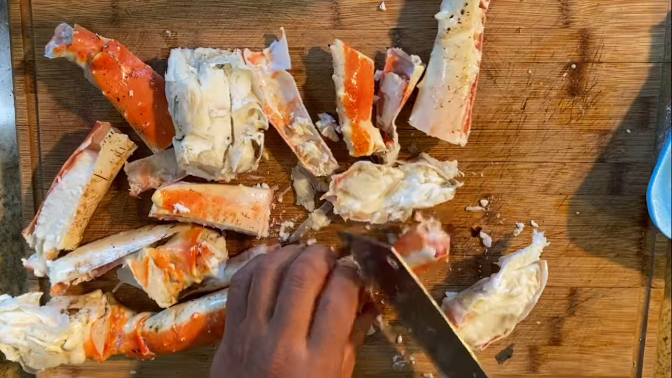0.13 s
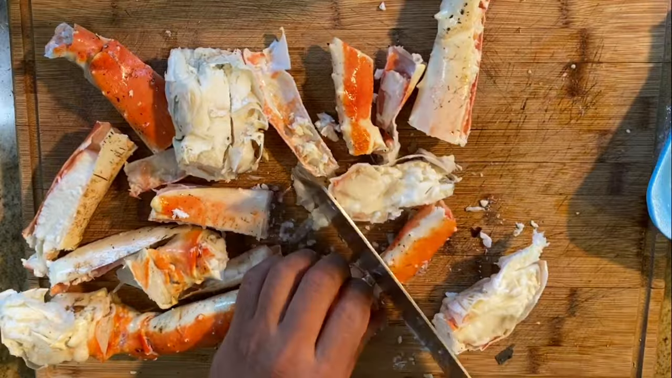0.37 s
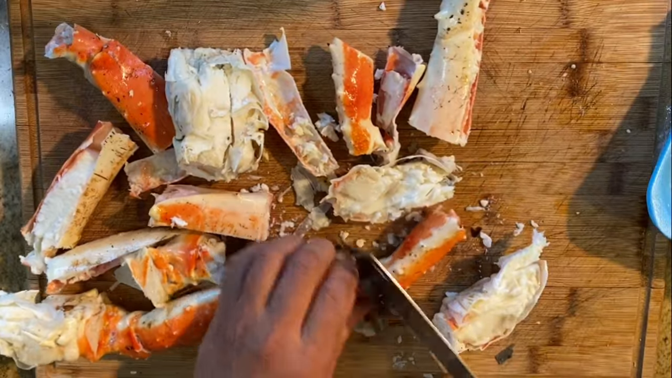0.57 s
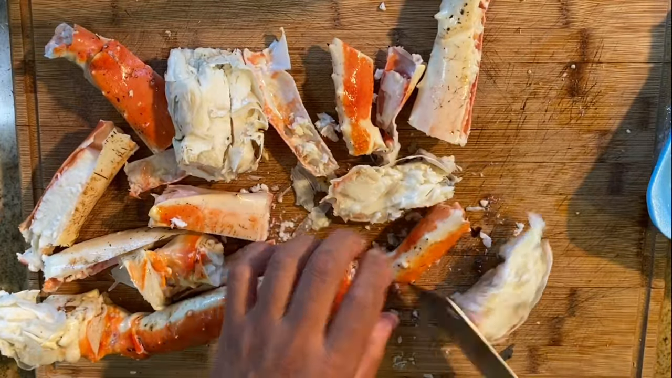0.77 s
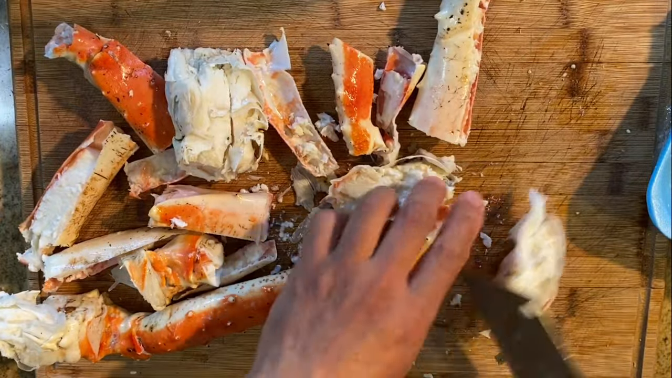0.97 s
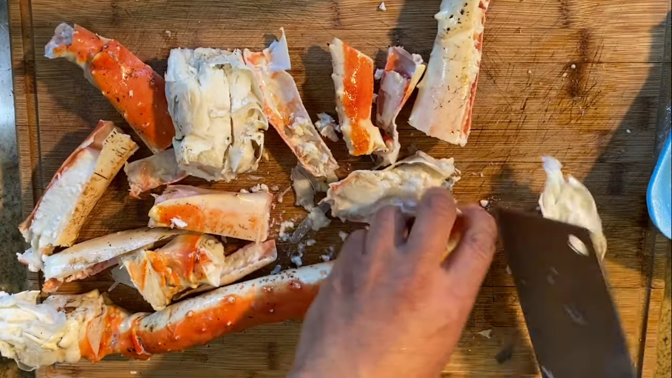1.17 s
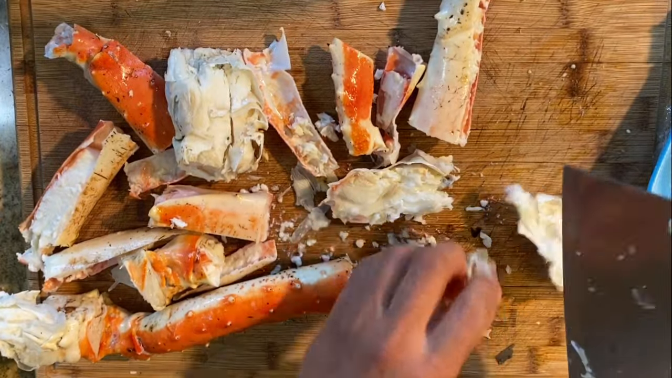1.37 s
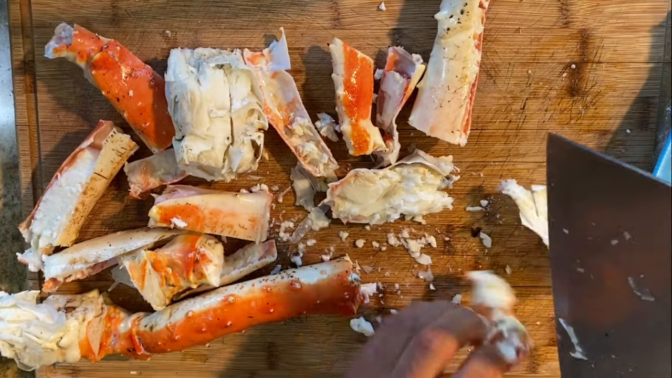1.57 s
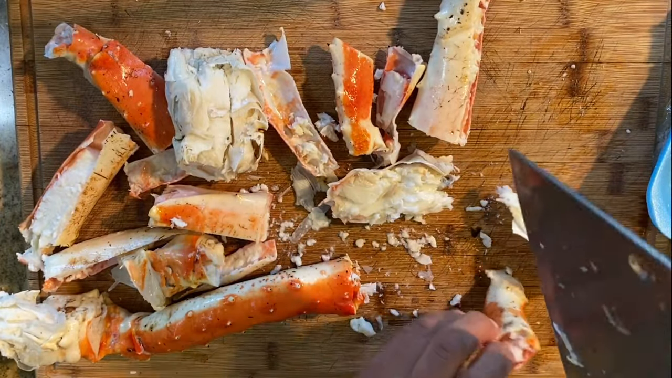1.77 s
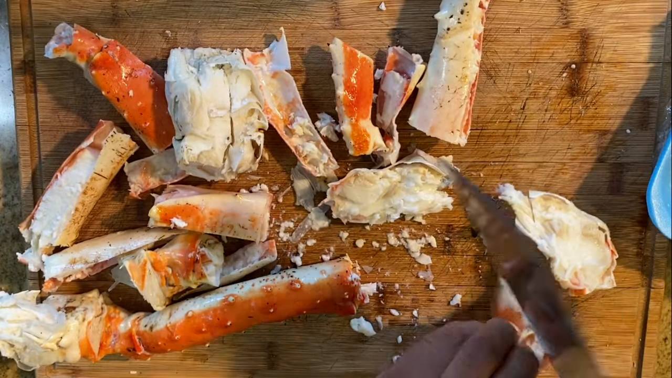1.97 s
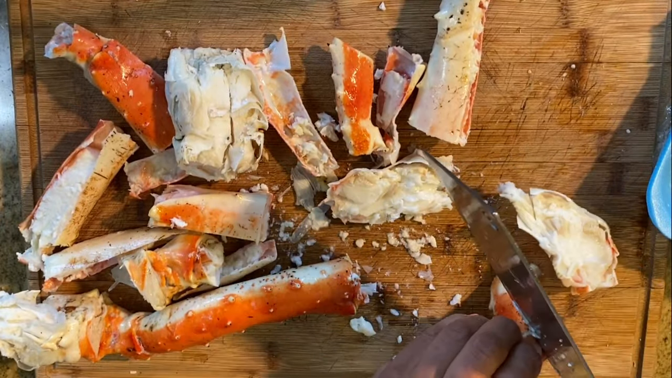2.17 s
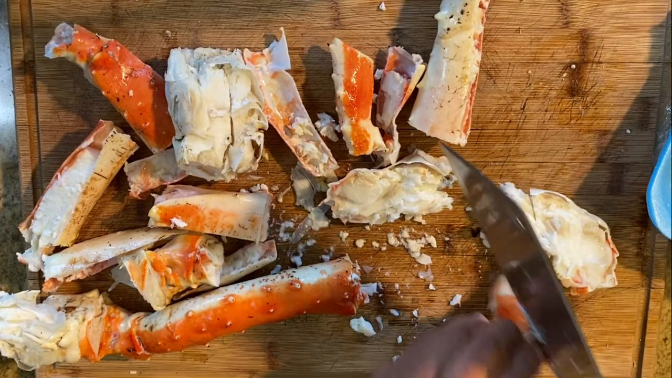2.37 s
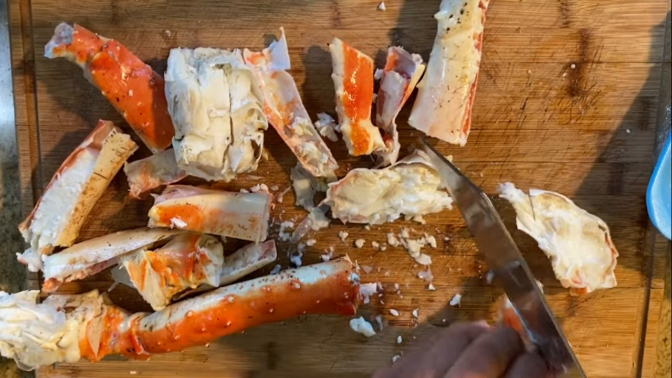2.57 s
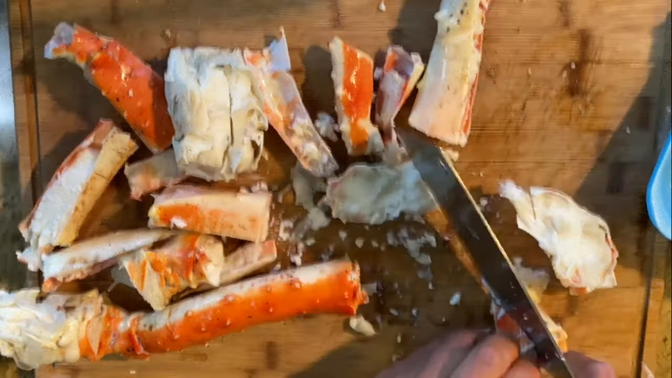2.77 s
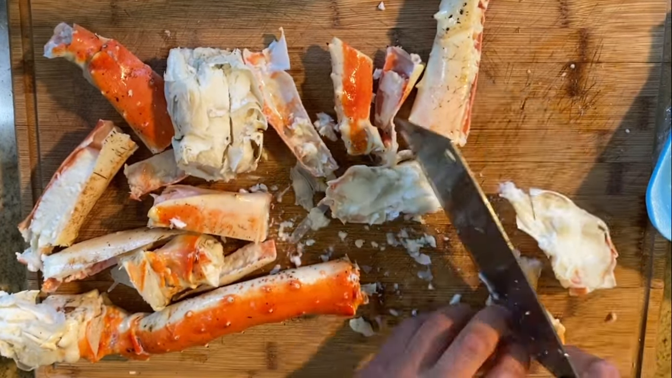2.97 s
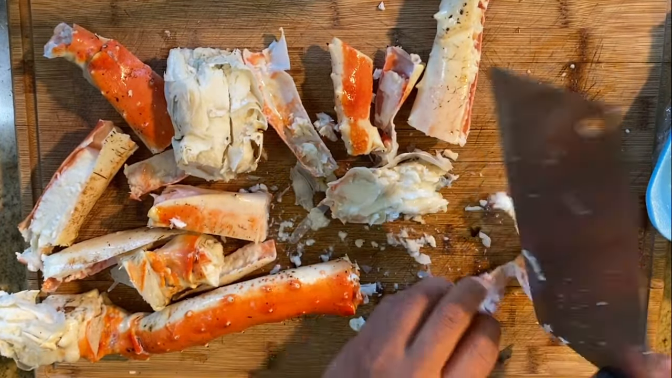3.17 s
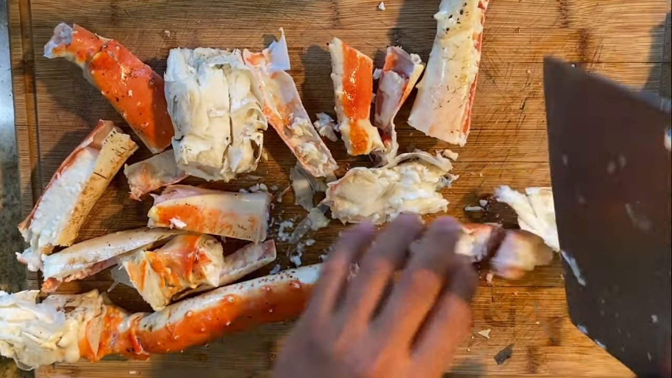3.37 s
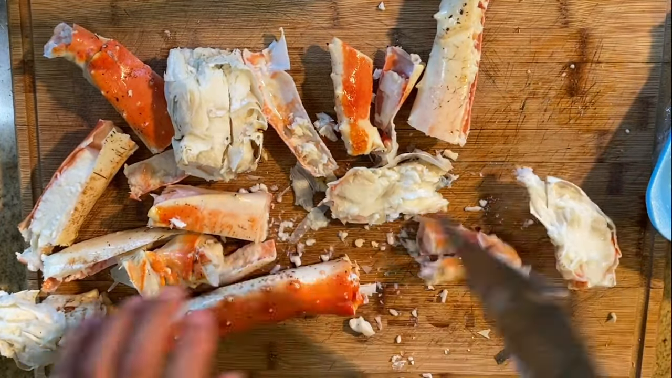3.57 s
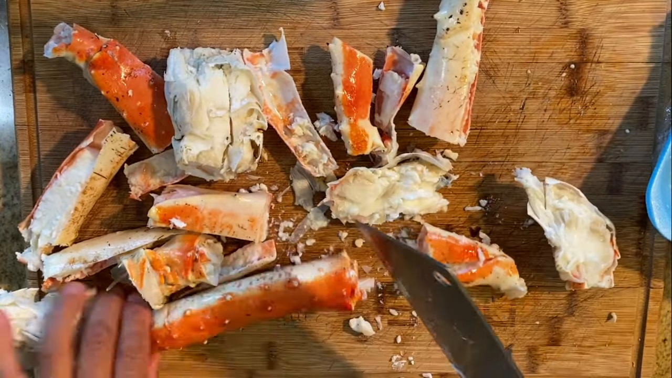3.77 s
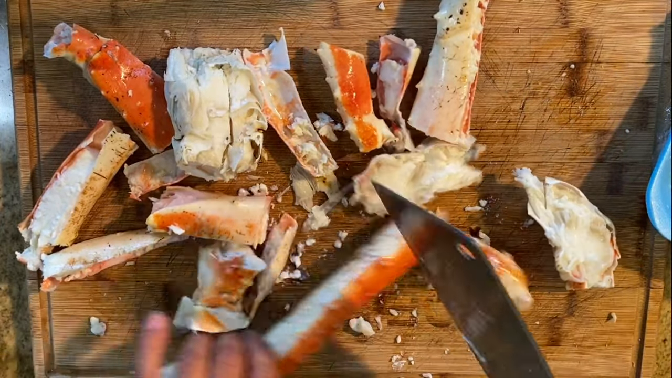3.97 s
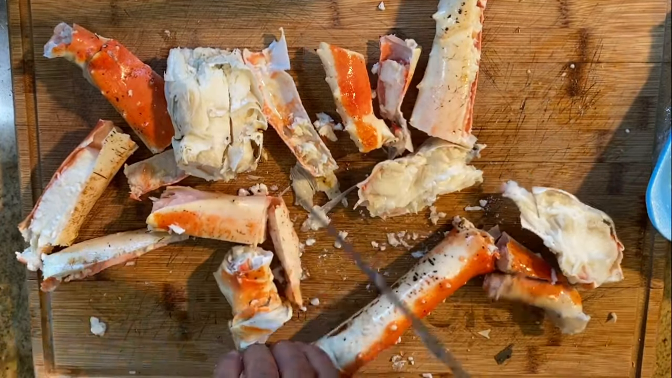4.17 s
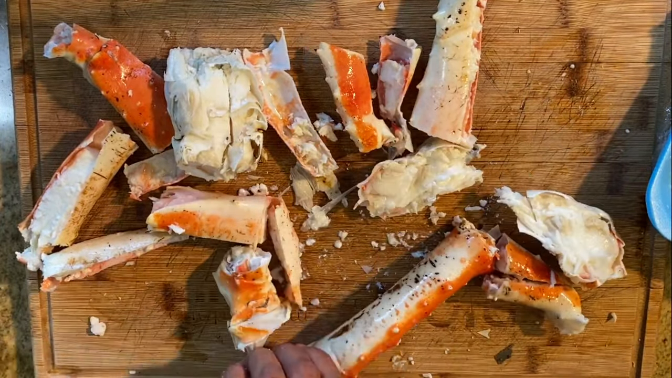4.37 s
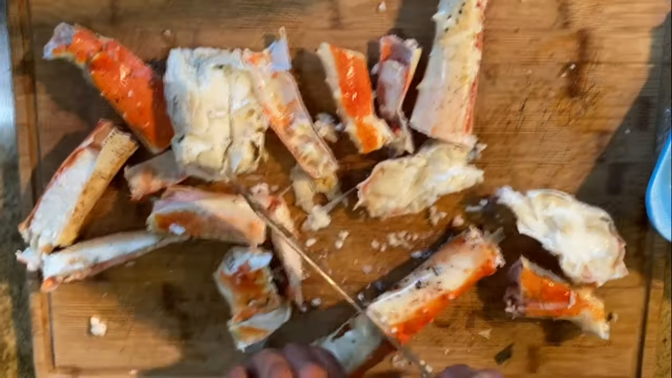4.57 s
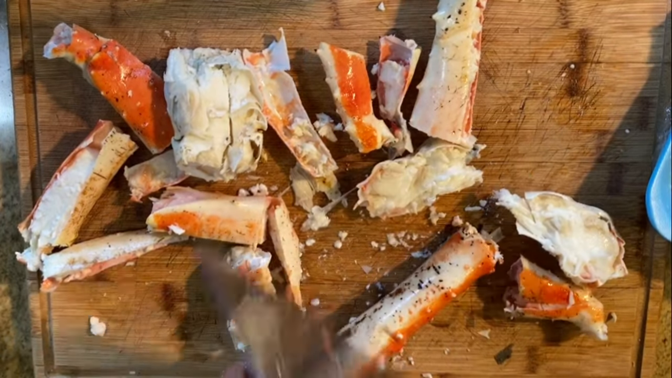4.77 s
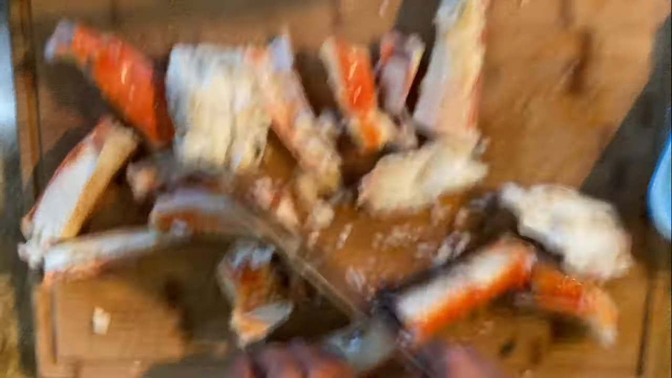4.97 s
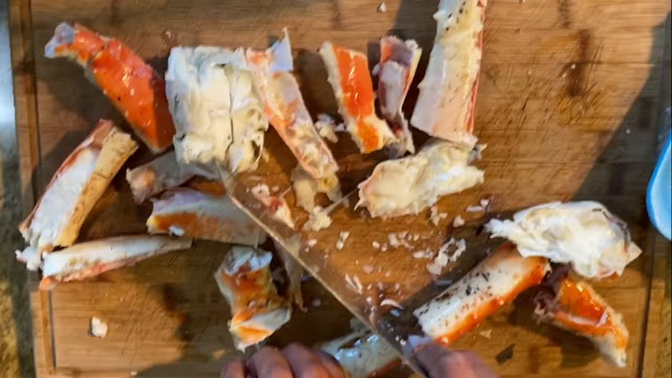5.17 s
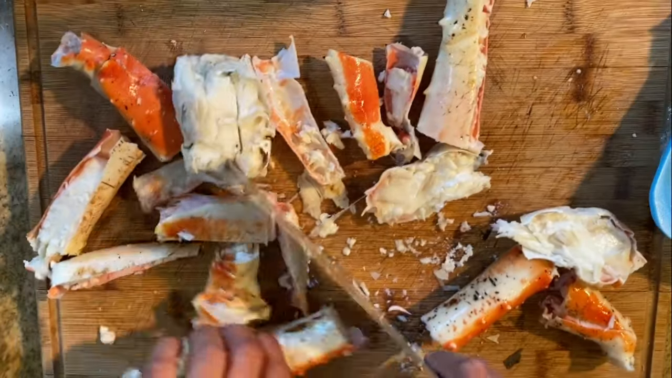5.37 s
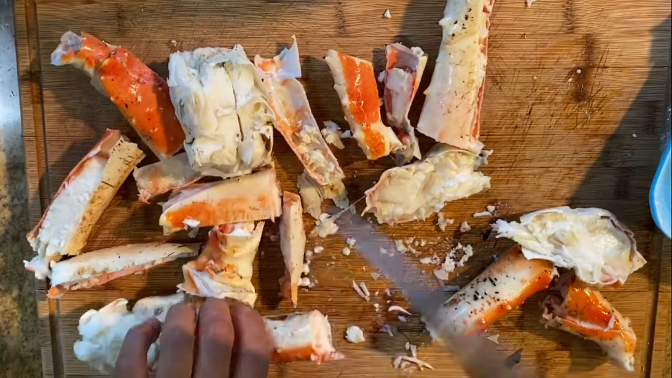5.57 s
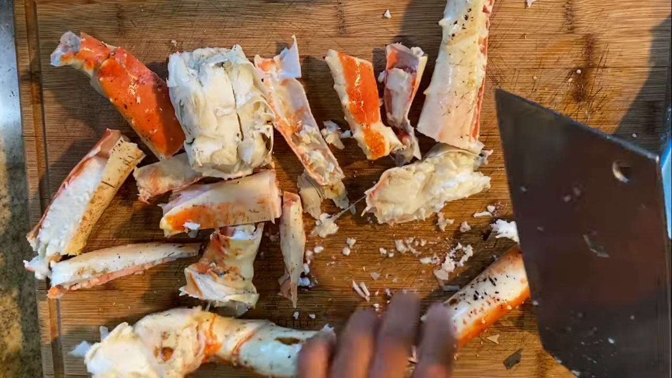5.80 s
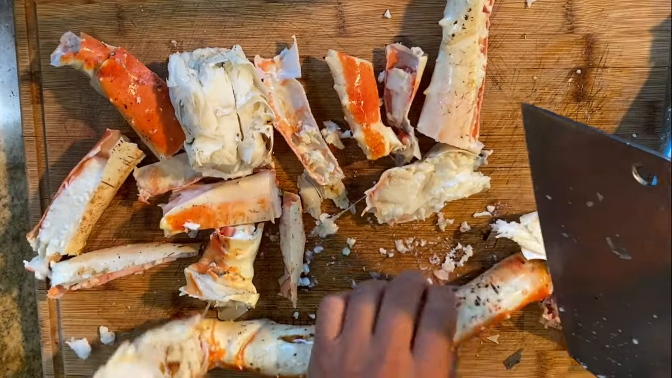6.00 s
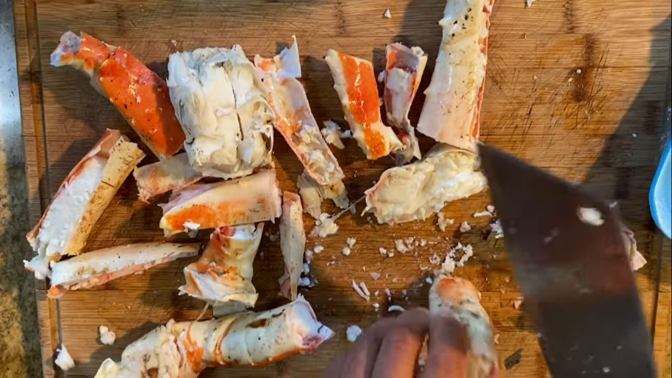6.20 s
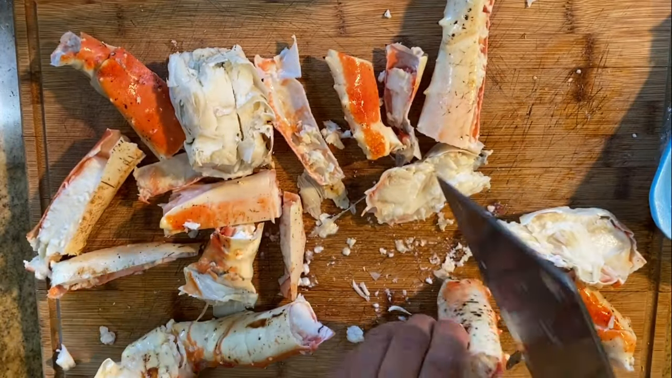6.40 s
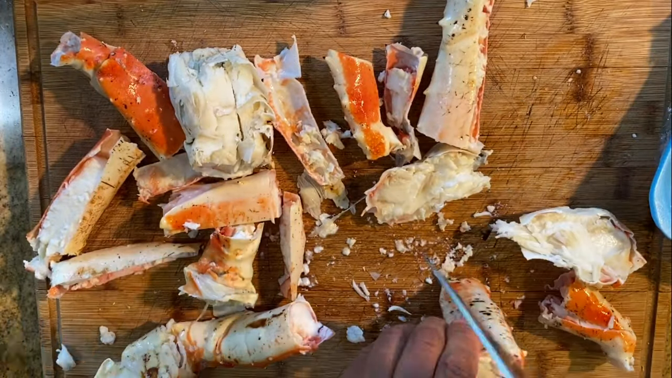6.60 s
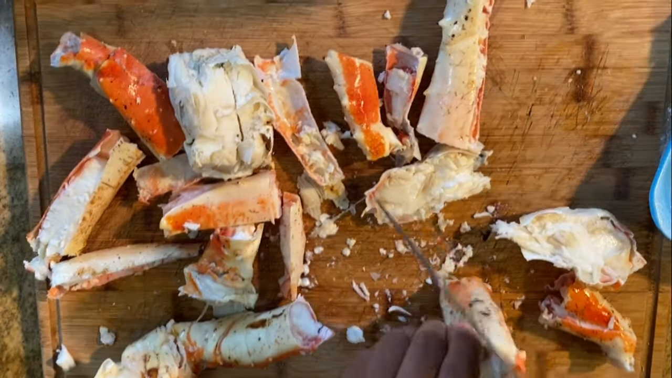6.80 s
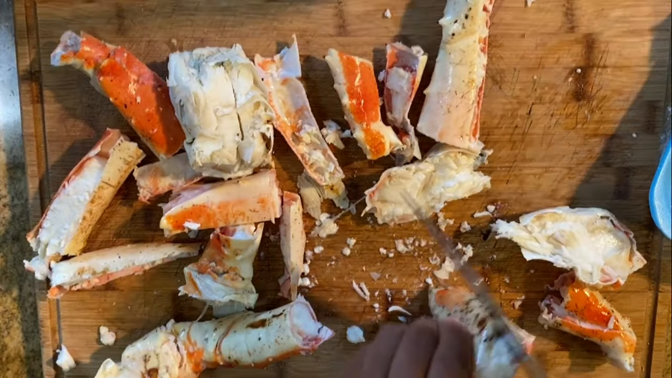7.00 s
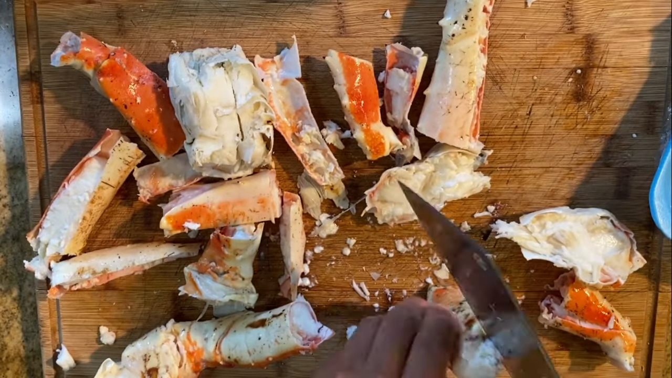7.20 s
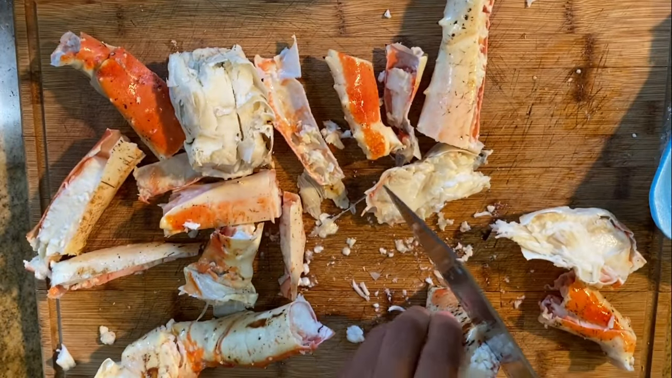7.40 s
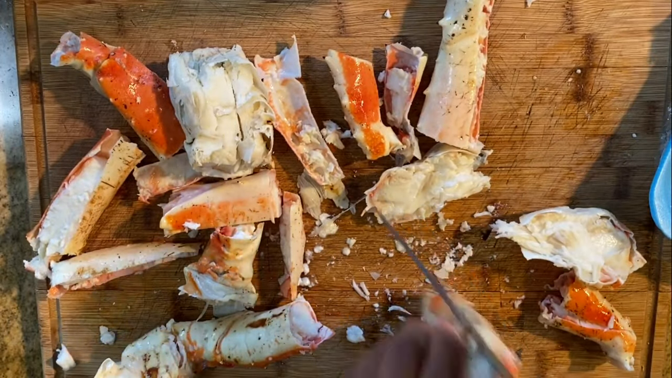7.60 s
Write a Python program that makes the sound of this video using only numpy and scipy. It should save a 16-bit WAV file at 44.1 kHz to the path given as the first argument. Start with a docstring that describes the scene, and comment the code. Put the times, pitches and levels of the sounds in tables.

```python
"""A small kitchen, the microphone close to a wooden board where a heavy knife chops crab legs.
Machines hum throughout. A few chops open: each splinters the shell in a volley of cracks and knocks
the board, and the room rings briefly. Three hard chops fall from 2 to 2.7 s, then pieces are slid and
tapped about. Two more land near 4.4 and 4.9 s; after more sliding, lighter chops close from 6.6 s.
A soft limiter holds the loudest blows."""
import sys
import numpy as np
from scipy import signal
from scipy.fft import rfft, irfft
from scipy.io import wavfile
from scipy.ndimage import uniform_filter1d

SR = 44100
rng = np.random.default_rng(int(sys.argv[2]) if len(sys.argv) > 2 else 0)


def generate_wav(sig):
    """Save sig (samples, or channels by samples) to the path in sys.argv[1] as 16-bit PCM at SR."""
    pcm = np.round(np.clip(np.atleast_2d(sig).T, -1, 1) * 32767).astype(np.int16)
    wavfile.write(sys.argv[1], SR, pcm)


N = 337213

# modes of the wooden board: (frequency [Hz], relative level [dB], free t60 [s])
BOARD_MODES = [(235, 1, 0.24), (287, -0.5, 0.05), (395, 0, 0.2), (510, 0.5, 0.037), (582, -3.5, 0.012),
               (722, 2, 0.028), (744, -3.5, 0.049), (823, 1, 0.063), (913, -3.5, 0.048),
               (1000, -1.5, 0.055), (1160, -3.5, 0.026), (1170, -1, 0.057), (1320, -6.5, 0.039),
               (1460, -3.5, 0.053), (1580, -4.5, 0.013), (1760, -4.5, 0.036), (1955, -3.5, 0.031),
               (2240, -6, 0.053), (2430, -5, .03), (2750, -4.5, .03), (3080, -8, 0.016),
               (3700, -13.5, 0.039)]


def gain_of(db):
    """Decibels to a factor."""
    return 10 ** (np.asarray(db) / 20)


def unit_rms(x):
    """Scales to rms 1."""
    return x / np.sqrt(np.mean(x ** 2) + 1e-20)


def curve_at(points, hz):
    """Interpolates a (frequency [Hz], value) table on a log axis."""
    f, value = np.transpose(points)
    return np.interp(np.log(hz + 1), np.log(f + 1), value)


def add(mix, s, sound):
    """Mixes a sound in at second s."""
    part = mix[round(s * SR):][:len(sound)]
    part += sound[:len(part)]


def coloured(x, spectrum):
    """Filters x by a (frequency [Hz], gain [dB]) table."""
    return irfft(rfft(x) * gain_of(curve_at(spectrum, np.fft.rfftfreq(len(x), 1 / SR))), len(x))


def patchy(noise, bins, frames):
    """Smooths a frequency-by-time grid of noise into patches of rms 1."""
    return unit_rms(uniform_filter1d(uniform_filter1d(noise, bins, axis=0), frames, axis=1))


def ring(modes, t, weight_db, phase_turns=0):
    """Dying sines, one for each mode."""
    hz, db, t60 = np.transpose(modes)[:, :, None]
    envelopes = gain_of(db + weight_db[:, None] - 60 * t / t60)
    return (envelopes * np.sin(2 * np.pi * (hz * t + phase_turns))).sum(0)


def wavering(hz, width_hz):
    """A tone whose strength and phase drift; narrow ones hold a steady core."""
    noise = rng.standard_normal(N) + 1j * rng.standard_normal(N)
    drift = signal.lfilter([1], [1, -np.exp(-np.pi * width_hz / SR)], noise)
    envelope = drift / abs(drift).std() + 8 / width_hz
    return unit_rms((envelope * np.exp(2j * np.pi * hz * np.arange(N) / SR)).real)


def room_tone():
    """The kitchen's low noise, drifting in patches."""
    # noise spectrum: (frequency [Hz], relative density [dB])
    spectrum = [(15, -71.5), (25, -42.5), (65, -14.5), (155, -14.5), (196, -20.5), (230, -5.5), (360, -27),
                (457, -14.5), (775, -23.5), (1390, -26.5), (1810, -39), (3990, -36.5), (13800, -44)]
    frames, hz = N // 256 + 5, np.fft.rfftfreq(1024, 1 / SR)
    real, imag, drift = rng.standard_normal((frames, 513, 3)).T
    bands = (real + 1j * imag) * gain_of(curve_at(spectrum, hz)[:, None] + 2.6 * patchy(drift, 20, 14))
    return gain_of(-58) * unit_rms(signal.istft(bands, nperseg=1024, noverlap=768)[1][:N])


def machine_hum():
    """The wavering tones of running machines."""
    # tones: (frequency [Hz], rms level [dB], width [Hz])
    tones = [(73, -64.5, 13), (153, -64, 9.7), (233, -62, 19), (4130, -78, 12), (15504, -73, 2)]
    return sum(gain_of(db) * wavering(hz, width_hz) for hz, db, width_hz in tones)


def machine_whir(rest_db=-77.5):
    """A fuzzy tone swells and fades over a faint rest level."""
    # swells: (peak time [s], peak level [dB], 20 dB rise [s], 20 dB fall [s])
    swells = [(0.15, -52, 0.08, .3), (0.5, -48, 0.09, 0.45), (0.82, -60, 0.36, 0.6),
              (2.84, -53, 0.17, 0.18), (3.7, -65.5, .2, 0.45), (4.6, -65.5, .1, 0.17),
              (5.11, -53, .08, 0.46), (6.19, -66, .15, .25), (7.3, -65.5, .15, .5)]
    t = np.arange(N) / SR
    swells_db = [db - 20 * np.where(t < s, (s - t) / rise, (t - s) / fall)
                 for s, db, rise, fall in swells]
    return gain_of(np.maximum(np.max(swells_db, 0), rest_db)) * wavering(1603, width_hz=70)


def kitchen_echoes(sent, next_room_db=-7.5, next_room_stretch=2.01):
    """Sparse echoes, each band dying at its own speed; the next room rings weaker and longer."""
    # decay of the kitchen: (frequency [Hz], t60 [s])
    decay = [(100, 0.17), (300, 0.2), (700, 0.25), (1800, 0.3), (5000, 0.28), (9000, .23), (14000, 0.098)]
    # colour of the echoes: (frequency [Hz], energy [dB])
    colour = [(100, -2.5), (500, -11), (2000, -7.5), (6000, -10.5), (14000, -11)]
    slots = np.arange(200, SR - 20, 20)
    turn = np.arange(N) / SR * 400
    echoes = np.zeros(N)
    for k in range(3):  # three tails take turns
        taps = np.zeros(SR)
        taps[slots + rng.integers(0, 20, len(slots))] = rng.choice([-1., 1.], len(slots))
        hz, t, bands = signal.stft(taps, SR, nperseg=256)
        fall_db = -60 * t / curve_at(decay, hz)[:, None]
        fall = np.hypot(gain_of(fall_db), gain_of(next_room_db + fall_db / next_room_stretch))
        fall /= np.linalg.norm(fall, axis=1)[:, None]  # equal energy in every band
        tail = signal.istft(bands * fall, SR, nperseg=256)[1]
        tail = coloured(tail / np.linalg.norm(tail), colour)
        share = np.sqrt(2 / 3) * np.cos(turn + 2 * np.pi * k / 3)
        echoes += signal.fftconvolve(sent * share, tail)[:N]
    return echoes


def slides_and_rustles(jerk_db=2, jerk_s=.03, ticks_per_s=500):
    """Jerky hiss and fine ticks over the board's drone, as when spiny shell catches on the grain."""
    # pieces slid over the wood, and faint rustles swelling just before the chops near 2.4, 2.7, 4.4
    # and 4.9 s: (start [s], length [s], level [dB], change to the end [dB], tilt [dB/octave],
    # drone against hiss [dB])
    strokes = [(0.0, 0.1, -53, -9, 9, -10), (0.219, .06, -43, -11, 7, -11),
               (0.438, 0.21, -46, 1.5, 7.5, 1.5), (0.68, 0.091, -49.5, -1, 0.5, -9.5),
               (0.762, 0.56, -63, 4, 4.5, -5.5), (1.389, 0.058, -60.5, 1, 2, -5),
               (1.451, 0.073, -55, -5.5, 5, -4.5), (2.35, 0.032, -63.5, 14, 6.5, -12),
               (2.631, .035, -62, 11.5, 6.5, -12), (4.395, .034, -65, 8, 6, -9),
               (4.903, .028, -63.5, 9.5, 4.5, -10), (2.879, 0.19, -45, -19.5, 6.5, -2.5),
               (3.091, 0.27, -66, 1, 10.5, -5.5), (3.36, .12, -58, -2, 1.5, -6.5),
               (3.503, 0.28, -63.5, 3, 4, -5.5), (3.763, 0.049, -57, -4, 8, -4.5),
               (3.792, 0.16, -43, -0.5, 3, -4), (3.94, .12, -46, 6.5, 5, -7),
               (4.048, 0.12, -41, -27.5, 5, -10), (5.033, .19, -39, -8.5, 2.5, -10),
               (5.36, 0.0363, -46.5, -6, 9, -3.5), (5.564, 0.1455, -56, -12, 1, -3),
               (5.744, 0.39, -61, -3, 1, -2), (6.108, .14, -53, -10, 2.5, -4.5),
               (6.282, 0.048, -59, -4.5, 7, -8), (6.391, 0.072, -61, -2, 3, -5.5),
               (7.098, 0.15, -62.5, 0, -1.5, -4), (7.389, .12, -57, -9, 3, -4)]
    # spectrum of the rubbing: (frequency [Hz], relative density [dB])
    rub = [(150, -22), (300, -3.5), (700, 3), (1300, 6.5), (3700, -7.5), (8000, -22), (14500, -34),
           (16000, -40)]
    ring_t = np.arange(2000) / SR
    weight_db = -7 * np.log2(np.transpose(BOARD_MODES)[0] / 700) ** 2
    board = ring(BOARD_MODES, ring_t, weight_db) * np.exp(-ring_t / 0.1)
    for s, length, db, change_db, tilt, drone_db in strokes:
        jerks = np.linspace(0, length, int(length / jerk_s) + 2)
        level_db = db + change_db * jerks / length + jerk_db * rng.standard_normal(64)[:len(jerks)]
        t = np.arange(s, s + length, 1 / SR)
        n = len(t)
        ticks = rng.exponential(1, n) * (rng.random(n) < ticks_per_s / SR)
        clumps_db = 2 * unit_rms(uniform_filter1d(rng.standard_normal(n), size=120))
        grit = rng.standard_normal(n) * gain_of(clumps_db) + 1.1 * ticks
        hz, _, bands = signal.stft(coloured(grit, rub), SR, nperseg=256)
        patches_db = 4.2 * patchy(rng.standard_normal(bands.shape[::-1]).T, 6, 8)
        bands *= gain_of(np.log2((hz[:, None] + 100) / 2000) * tilt + patches_db)
        bands /= np.sqrt(uniform_filter1d((abs(bands) ** 2).sum(0), size=9))  # steady the power
        hiss = unit_rms(signal.istft(bands, SR, nperseg=256)[1][:n])
        drone = unit_rms(signal.oaconvolve(grit, board)[:n]) * gain_of(drone_db)
        envelope = gain_of(np.interp(t, s + jerks, level_db)) * signal.windows.tukey(n, .15)
        yield s, (hiss + drone) * envelope, 0


def blade_pings():
    """The blade is struck or brushed, and its modes nearest the stirred pitch sing out."""
    # touches on the blade: (time [s], relative level [dB], stirred pitch [Hz])
    touches = [(.1, -29, 5100), (2.407, -30, 4400), (6.652, -42, 5100), (.245, -33, 9430), (.58, -30, 9450),
               (.715, -54, 8730), (.715, -55, 11500), (2.712, -35.5, 2890), (2.712, -30.5, 1900),
               (3.312, -46, 5100), (5.377, -45.5, 8970), (5.377, -50, 9550), (6.16, -61, 7900),
               (6.652, -42.5, 2620)]
    # modes of the blade: (frequency [Hz], relative level [dB], t60 [s])
    modes = [(1863, -1.5, 0.54), (2630, -0.5, 0.32), (2890, 0.5, .4), (4400, 0.5, .12), (5100, 1, 0.049),
             (7900, 3, .15), (8800, 6, 0.05), (9110, 3.5, .12), (10100, 1, 0.19), (11500, 6, 0.068)]
    t = np.arange(12000) / SR
    for s, db, hz in touches:
        apart = np.log(np.transpose(modes)[0] / hz)
        weight_db = -np.minimum((apart / .009) ** 2, 80)
        yield s, gain_of(db) * ring(modes, t, weight_db) * (1 - np.exp(-t / .002)), 0


def board_knocks(load_detune=0.021):
    """A blow rings the board until the flesh and hand on it choke the ring; the counter booms below."""
    # blows: (time [s], relative level [dB], pitch favoured by the spot struck [Hz], damping time [ms],
    # relative counter thump [dB], room send [dB])
    blows = [(0.1022, -21.5, 810, 3.5, -16.5, 3.5), (0.223, -40.5, 870, 7.1, -21, 9),
             (0.2957, -21.5, 1295, 3.8, -38, -0.5), (0.381, -1.5, 795, 7.8, -20.5, -3.5),
             (0.3927, -15, 806, 5, -30, 4), (0.7205, -33.5, 765, 14, -35, -4),
             (1.181, -22, 1095, 12, -14.5, 4), (1.1837, -16, 300, 7.7, -14.5, 3),
             (1.4021, -42, 840, 9.2, -9, -1), (1.424, -45, 900, 5, -20.5, 0),
             (1.6644, -39, 854, 7.5, -22, 5), (1.982, -19, 879.4, 5, -25, -0.5),
             (1.9884, -19.5, 910, 6, -25.5, 1), (1.9935, -22, 892, 9.7, -24, 0),
             (2.379, -17, 1060, 2.9, -11, -1), (2.3944, -22.5, 710, 7.2, -24, -4),
             (2.664, -6, 1400, 9.5, -26, 1), (2.6748, -16.5, 870, 7.5, -19, 3),
             (2.7011, -24, 713, 6.7, -31, 14), (2.7075, 2.5, 1330, 1.8, -19.5, 1),
             (2.7131, -0.5, 1060, 1.94, -26, 4), (3.0772, -36.5, 880, 7.6, -21.5, 4.5),
             (3.3522, -28.5, 870, 5.3, -19, 1.5), (3.512, -40.5, 835, 9.6, -12, -1),
             (3.7456, -37.5, 397, 11.5, -15, -3), (4.0519, -29, 720, 6.8, -17, 2),
             (4.4300, -0.5, 875, 3.3, -22.5, 0), (4.4417, -8.5, 490, 6.3, -23, -3),
             (4.6842, -40.5, 1088, 7.5, -18.5, 5), (4.93, -10, 840, 4.7, -16, -6),
             (4.933, -12, 1880, 7.74, -20, 7.5), (4.9439, 3.5, 885, 2.05, -15.5, -1.5),
             (5.2338, -30.5, 1100, 4.3, -10, 1), (5.3013, -35.5, 1238, 7.2, -14, 7.5),
             (5.3634, -40.5, 870, 12, -15, 0), (5.427, -35.5, 720, 9.4, -29, -11.5),
             (5.4357, -28, 776, 2.2, -21, 5.5), (5.535, -33, 870, 6.9, -20.5, -4),
             (5.591, -37, 1061, 5.9, -21.5, -5.5), (5.61, -38.5, 870, 8.8, -17.5, 5.5),
             (5.7283, -37.5, 1050, 4.2, -21.5, -1.5), (5.8006, -41.5, 1060, 9.9, -22.5, -3),
             (5.957, -44, 1212, 11.3, -26, 6.5), (6.0878, -27, 1145, 6.9, -20, 2.5),
             (6.6454, -28.5, 1885, 8.7, -15.5, -1), (6.6548, -25.5, 1070, 6.2, -9.5, 2),
             (6.8, -45.5, 1100, 5.17, -24.5, -1), (6.9695, -30, 884, 11.3, -15.5, 2.5),
             (6.9747, -30.5, 880, 15.6, -3, 2), (7.6245, -16, 705.3, 11, -14, 5)]
    # modes of the counter: (frequency [Hz], relative level [dB], t60 [s])
    counter = [(60, -16.5, 0.16), (99, -3.5, 0.17), (133.6, 0, 0.12), (167, 5, 0.071), (198, -1.5, 0.078),
               (249, -0.5, 0.092), (337, 0.5, 0.053)]
    t = np.arange(12000) / SR
    per_mode = (len(BOARD_MODES), 1)
    for s, db, hz, ms, thump_db, send_db in blows:
        phase_turns = 0.39 * rng.standard_normal(per_mode)  # the spot sets each mode off differently
        breadth_octaves = 0.97 * (6 / ms) ** .4  # longer rings reach fewer modes
        apart = np.log2(np.transpose(BOARD_MODES)[0] / hz) / breadth_octaves
        envelope = (1 - np.exp(-t / 0.00027)) * np.exp(-(t * 1000 / ms) ** 0.59)
        # what lies on the board detunes it from blow to blow
        loaded = BOARD_MODES * (1 + load_detune * rng.standard_normal(per_mode) * [1, 0, 0])
        wood = envelope * ring(loaded, t, -6 * np.minimum(apart ** 2, 6), phase_turns)
        wood *= np.linalg.norm(envelope) / np.linalg.norm(wood)
        boom = ring(counter, t, 0.73 * rng.standard_normal(len(counter))) * (1 - np.exp(-t / 0.0044))
        boom *= gain_of(thump_db + 2) / abs(boom).max()
        yield s, gain_of(db - 2.5) * (wood + boom), send_db


def crack_volleys(spacing_ms=2.6, scatter_db=2, pitch_scatter=0.32):
    """Splits in the shell follow at a loose pace, each with its own strength and shard."""
    # volleys of cracks, from the chops and two short scrapes: (start [s], length [ms], relative
    # level [dB], change to the end [dB], shard ring [Hz], treble tilt [dB/octave], room send [dB])
    volleys = [(0.096, 6, -21.5, 4.5, 3300, -3, -2), (0.3775, 3.57, -19.5, 12, 6000, 1, 0.5),
               (1.181, 5.8, -15, -14, 4000, -7, -0.5), (1.971, 10, -33, -1.5, 3998, -3, -3.5),
               (1.985, 7, -7.5, -3, 5047, 0.5, -2), (2.379, 11, -9.5, 3.5, 9000, 0, -2),
               (2.665, 25.6, -5.5, -7, 5500, 1.5, 0.5), (4.4289, 11.6, -6, -5.5, 4430, -0.5, -1),
               (4.928, 20, -6.5, 2.5, 5000, -2.5, -1.5), (6.6405, 6, -15, 2, 5200, 1, -3),
               (6.966, 14.1, -26.5, 9, 6000, -3, -2), (7.6258, 9.2, -14, -6, 5300, 1, -2.5),
               (0.213, 7.1, -44.5, 10, 8000, 2, 3), (0.711, 17.6, -45, 9.5, 6000, -5, 5)]
    splits = []
    for s, ms, db, change_db, hz, tilt, send_db in volleys:
        grid_ms = np.arange(0, ms + .1, spacing_ms)
        for due_ms, (lag, strength, pitch) in zip(grid_ms, rng.standard_normal((24, 3))):
            at_ms = abs(due_ms + .25 * spacing_ms * lag * (due_ms > 0))
            split_db = db + change_db * due_ms / ms + scatter_db * strength
            splits.append((s + at_ms / 1000, split_db, hz * np.exp(pitch_scatter * pitch), tilt, send_db))
    return splits


def shell_cracks(splits, decay_s=0.00085, lead_s=.002):
    """Each crack or split is a spray of tiny fractures that dies fast and crumbles on."""
    # single cracks and ticks: (time [s], relative level [dB], shard ring [Hz], treble tilt [dB/octave],
    # room send [dB])
    singles = [(0.1244, -30.5, 7400, 6, 8), (0.223, -30, 7400, -1, 9), (0.2465, -27, 13000, 4, 7),
               (0.295, -28, 5100, -6.5, 0), (0.394, -21.5, 3200, -10, 6), (0.9296, -37, 3750, -6.5, 0),
               (1.6645, -43.5, 4360, -12, -5.5), (1.6846, -40, 2680, -1.5, -5), (1.982, -16, 4200, -8, 0),
               (1.9878, -6.5, 11330, 0.5, -3), (1.9962, -8.5, 10170, 1, 4), (2.386, -4, 13800, -1.5, -3.5),
               (2.4054, -11.5, 4310, 1, 11.5), (2.4128, -32, 7196, 3, 5), (2.7111, -2, 3800, -8, -1),
               (3.0764, -42.5, 3760, 2, 5), (3.14, -43.5, 7200, -5.5, -4), (3.3119, -42, 8480, 0.5, 2.5),
               (3.7465, -40, 9660, -3, 5), (3.8245, -30, 5870, -6, 14), (3.83, -30, 5950, -6, -3),
               (4.051, -35, 2846, -10.5, -3), (4.6708, -40.5, 3626, -0.5, -1.5),
               (4.684, -27.5, 4280, 0, -3.5), (4.9215, -35.5, 6110, -12, -1.5),
               (4.9389, -2.5, 5067, 6, -12.5), (5.2336, -28, 3240, -6.5, 5), (5.2995, -29, 4470, -9, 2),
               (5.353, -38, 4900, -5, -2), (5.3749, -29.5, 3160, -4.5, 2.5), (5.4359, -38, 2800, -12, -4.5),
               (5.4789, -42, 4240, -5.5, 12.5), (5.536, -48, 2800, 0.5, 0), (5.5936, -33, 2930, -10, -2),
               (5.8, -44, 2800, -4.5, -4), (5.9476, -44, 4850, -8, 7), (6.0864, -19.5, 3420, -16, -4),
               (6.1169, -45.5, 3210, 3, 1.5), (6.6514, -11.5, 4852, 0.5, 0.5), (6.659, -20.5, 12930, 10, 2),
               (6.958, -40, 4880, -5, 0), (6.9773, -13.5, 6780, 7, 3.5), (7.4233, -43, 2783, -5.5, 2.5),
               (7.6301, -15.5, 5680, -8, -2), (1.9921, -7.5, 6200, 0.5, -1.5),
               (2.3938, -14.5, 9600, -1, -5.5), (2.6994, -7, 4385, 0, -3), (2.942, -46, 9000, 0, -2),
               (2.972, -56, 9000, 3, -0.5), (4.4437, -5.5, 5940, -3, 1.5), (5.91, -48, 3675, -2, -2.5),
               (6.5398, -51.5, 9800, .5, -3), (7.2199, -49.5, 8050, 1, 2.5), (7.6156, -36, 6500, -4, -5),
               (7.6433, -14, 4920, 1, 4)]
    # spectrum of snapping shell: (frequency [Hz], relative level [dB])
    snap = [(500, -23), (1200, -9.5), (2500, -6.5), (5000, -4), (9000, -4.5), (13000, -6.5), (15300, -12),
            (16000, -19.5)]
    n = 2048
    t = np.maximum(np.arange(n) / SR - lead_s, 0)
    envelope = (1 - np.exp(-t / 0.00022)) * (np.exp(-t / decay_s) + 0.15 * np.exp(-t / .006))
    hz = np.fft.rfftfreq(n, 1 / SR) + 1
    for s, db, shard_hz, tilt, send_db in singles + splits:
        burst = rfft(rng.standard_normal(n) * envelope)
        burst /= np.sqrt(uniform_filter1d(abs(burst) ** 2, size=30))  # a fracture is broad and even
        tilt_db = tilt * np.log2(np.maximum(hz, 2000) / 5000)
        shard_db = 8 * np.exp(-(np.log(hz / shard_hz) / .2) ** 2)  # the shard favours one band
        grit = irfft(burst * gain_of(curve_at(snap, hz) + tilt_db + shard_db), n)
        grit *= np.linalg.norm(envelope) / np.linalg.norm(grit)
        yield s - lead_s, gain_of(db + 0.97) * grit, send_db


def scene():
    """Board, blade and shell close to the microphone, with the kitchen's echoes and noise behind."""
    background = room_tone() + machine_hum() + machine_whir()
    splits = crack_volleys()
    sounds = [*board_knocks(), *blade_pings(), *slides_and_rustles(), *shell_cracks(splits)]
    close, sent = np.zeros(N), np.zeros(N)
    for s, sound, send_db in sounds:
        add(close, s, sound)
        add(sent, s, sound * gain_of(send_db))  # hand and blade shade the room or the microphone
    return (close + kitchen_echoes(sent) + background)[None]


def record(dry):
    """The microphone drops the deepest bass, a soft limiter rounds the peaks, the top treble is cut."""
    low_cut_hz, high_cut_hz, ceiling = 62, 15900, .9
    heard = signal.sosfilt(signal.butter(3, low_cut_hz, "high", fs=SR, output="sos"), dry)
    limited = ceiling * np.tanh(heard / ceiling)
    lowpass = signal.firwin(255, high_cut_hz, window=("kaiser", 9), fs=SR)
    return signal.oaconvolve(limited, lowpass[None], "same")


dry = scene()
out = record(dry)
generate_wav(out)
```